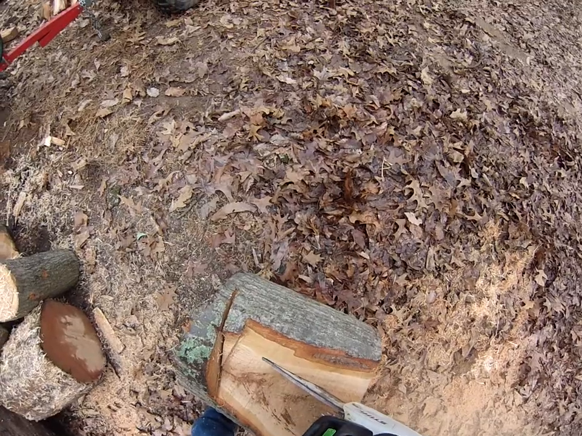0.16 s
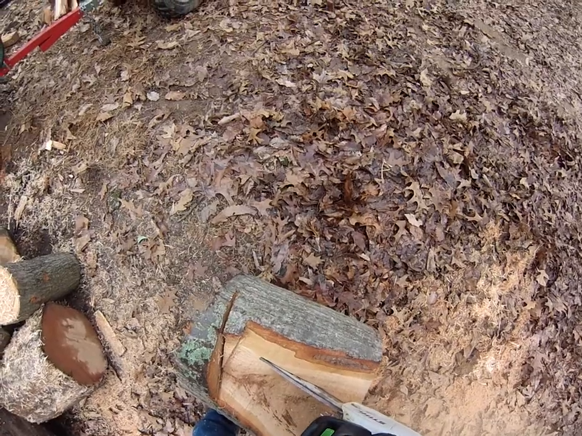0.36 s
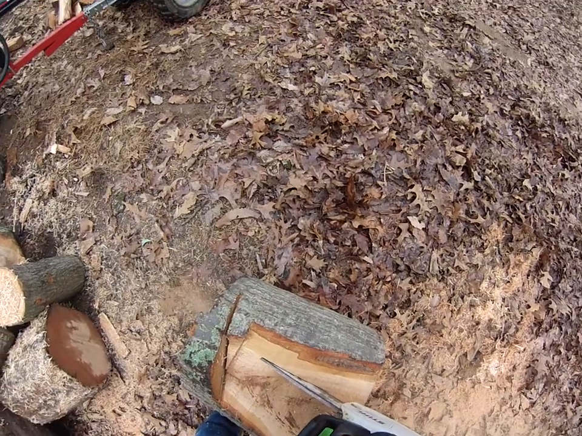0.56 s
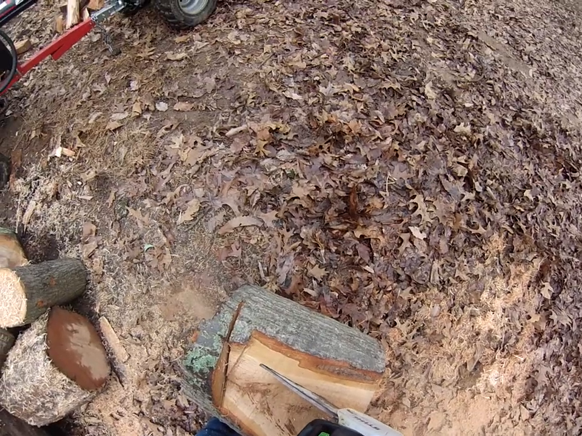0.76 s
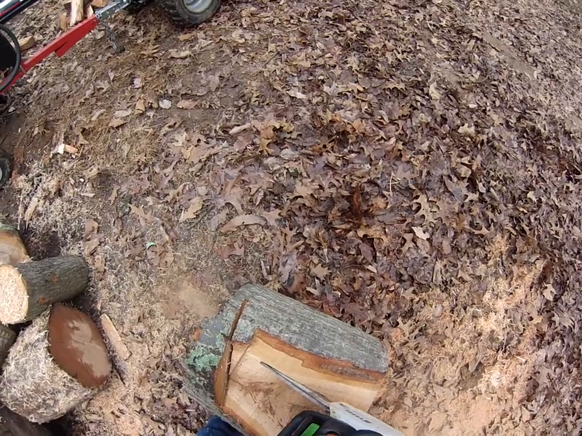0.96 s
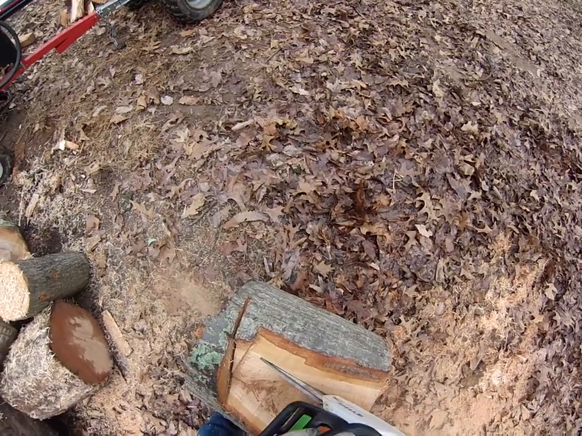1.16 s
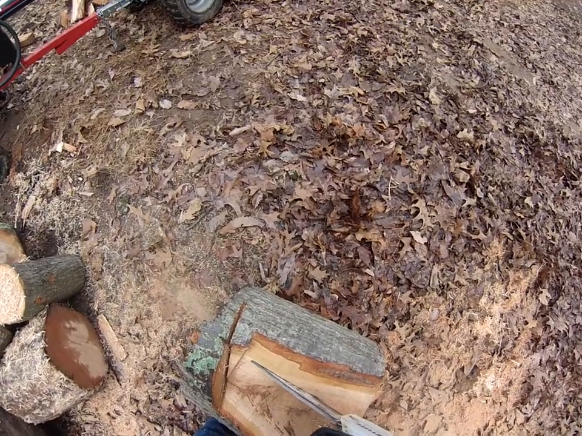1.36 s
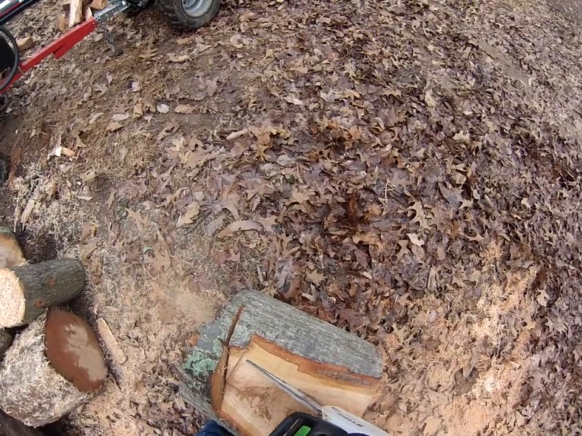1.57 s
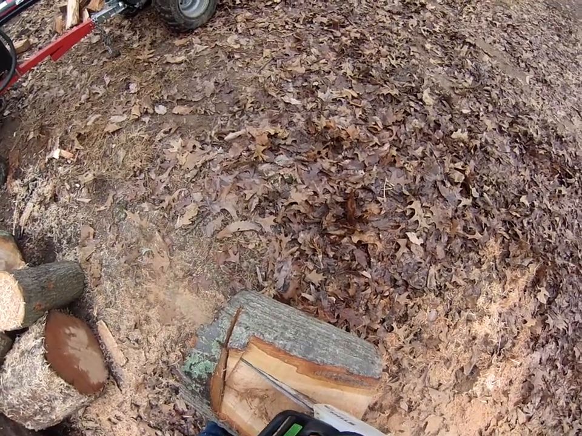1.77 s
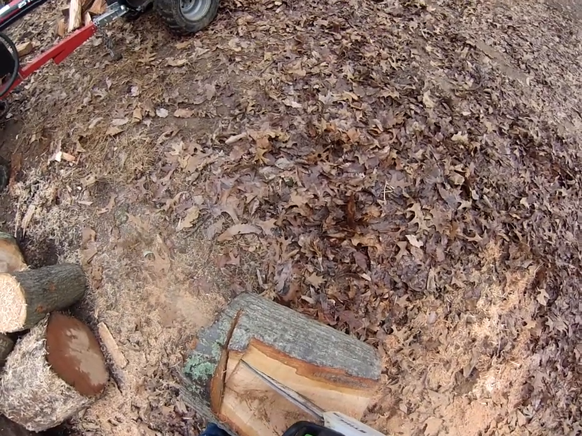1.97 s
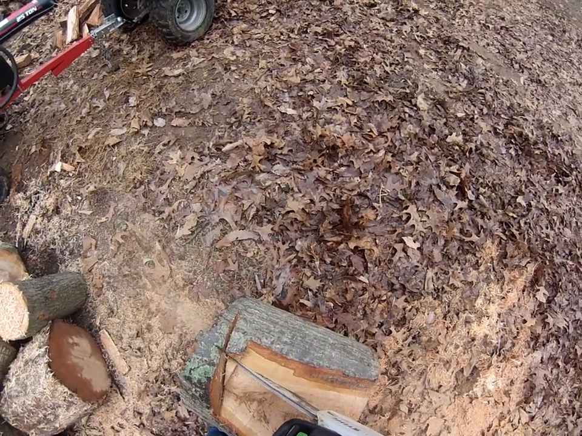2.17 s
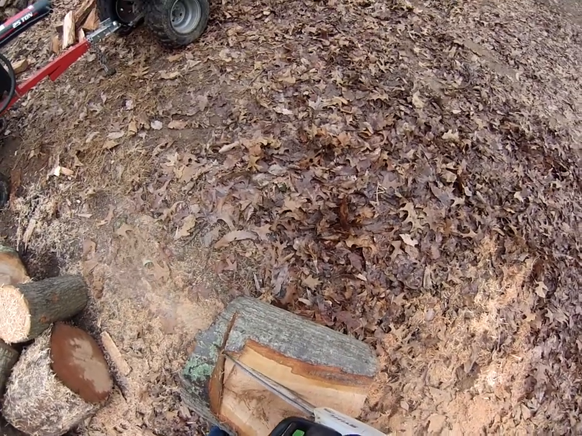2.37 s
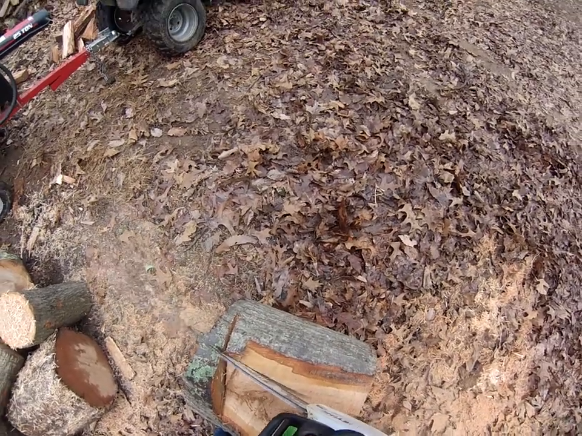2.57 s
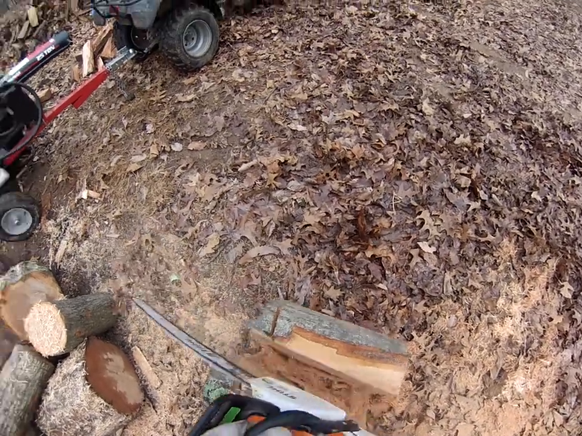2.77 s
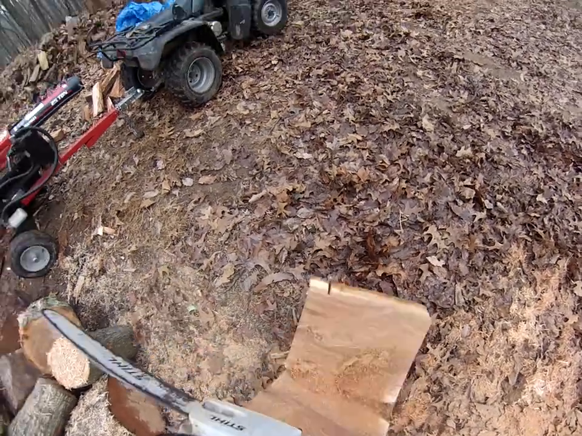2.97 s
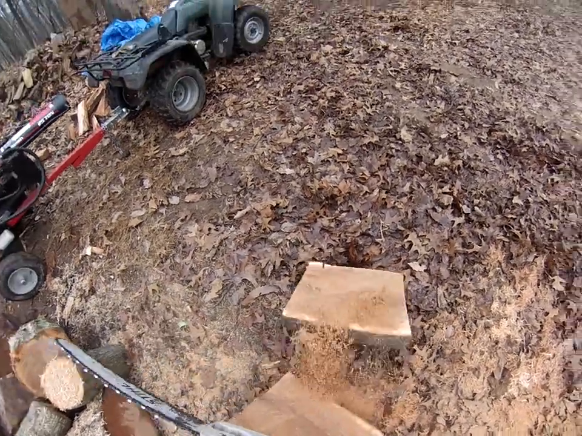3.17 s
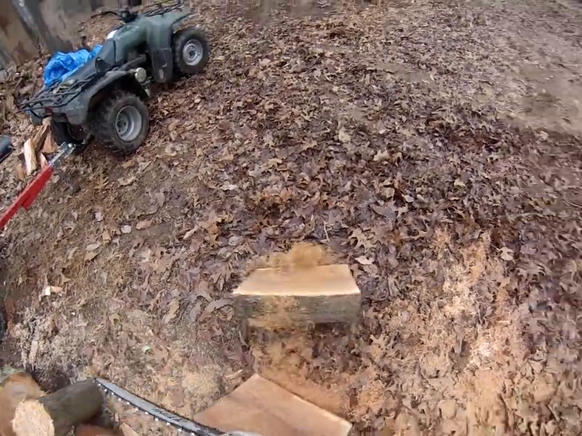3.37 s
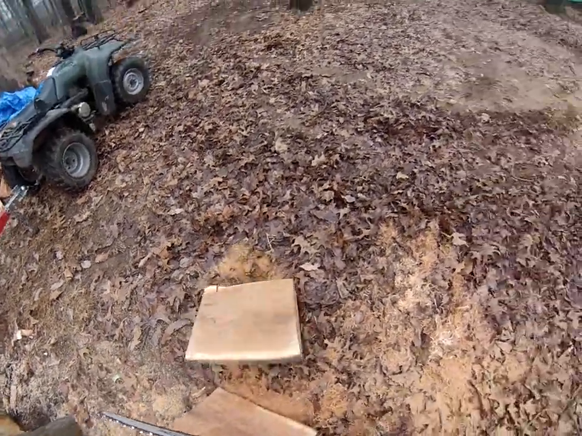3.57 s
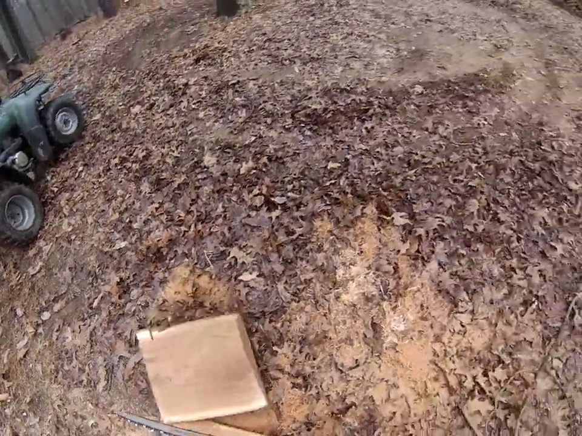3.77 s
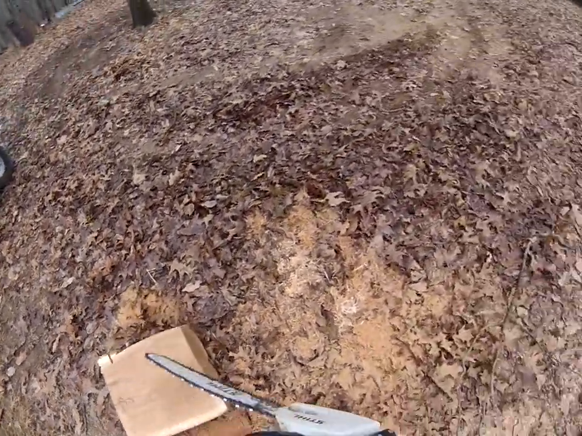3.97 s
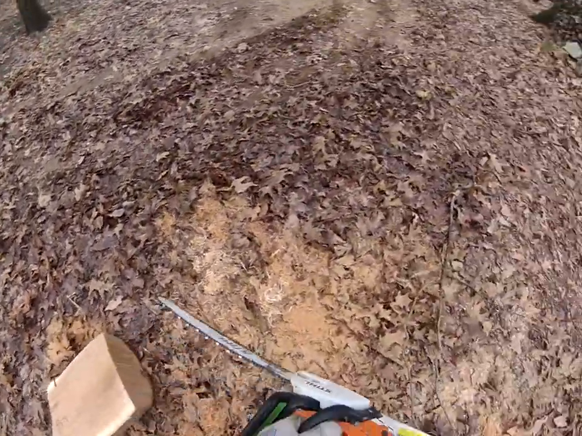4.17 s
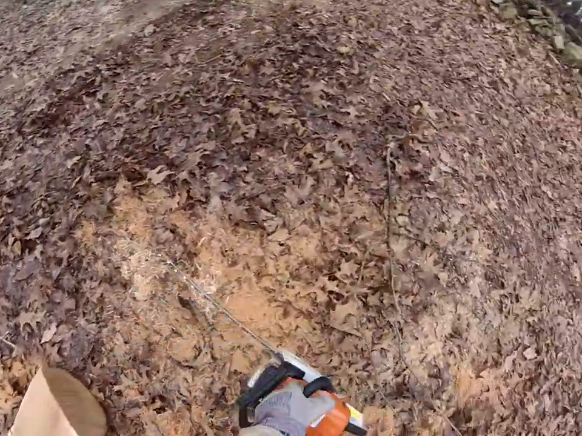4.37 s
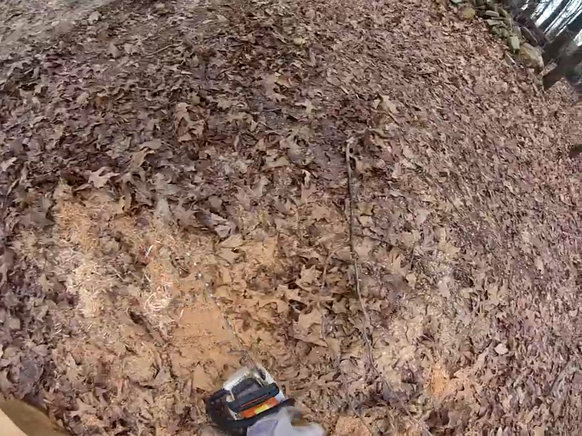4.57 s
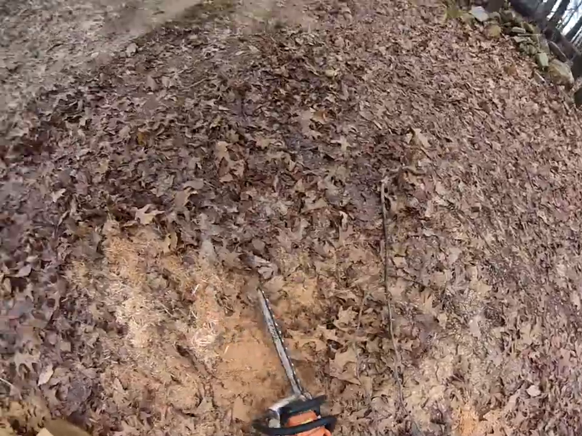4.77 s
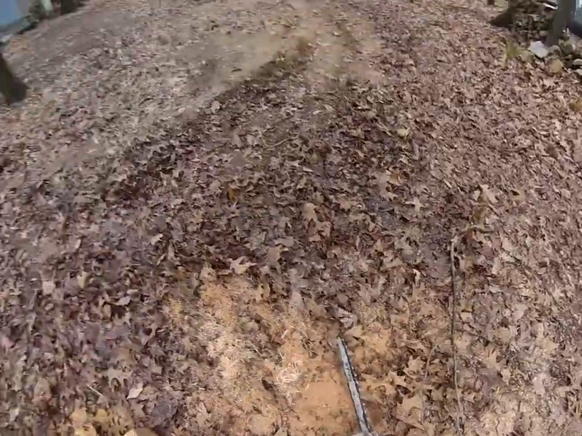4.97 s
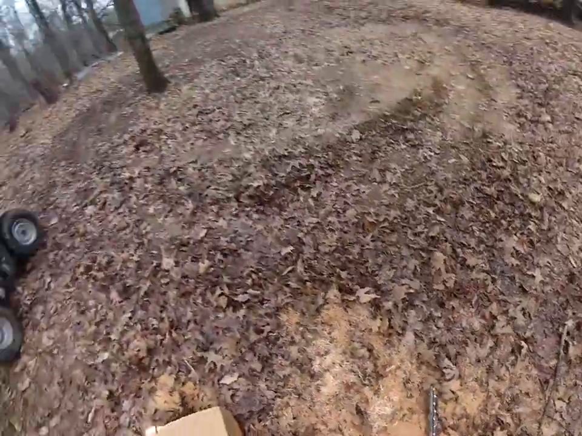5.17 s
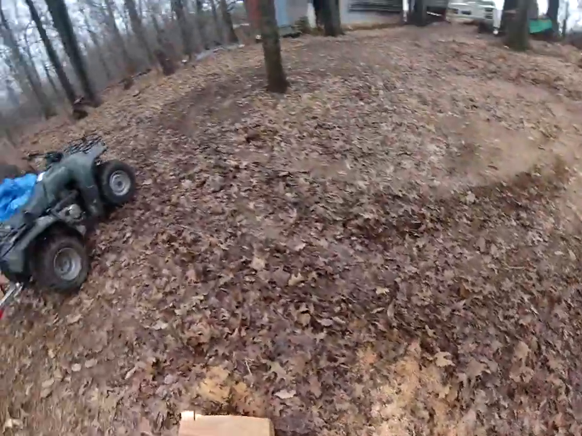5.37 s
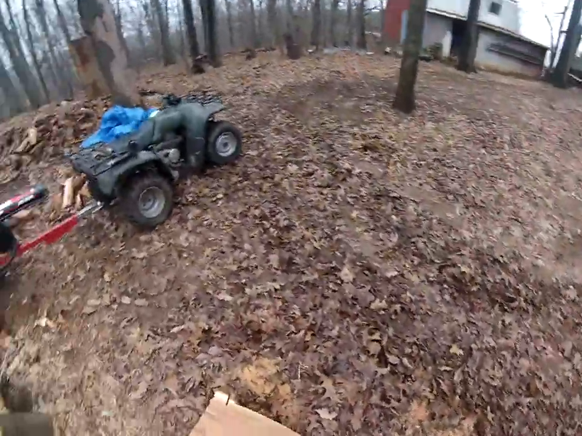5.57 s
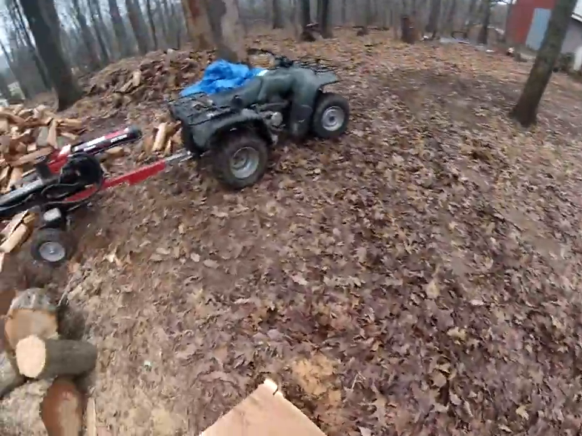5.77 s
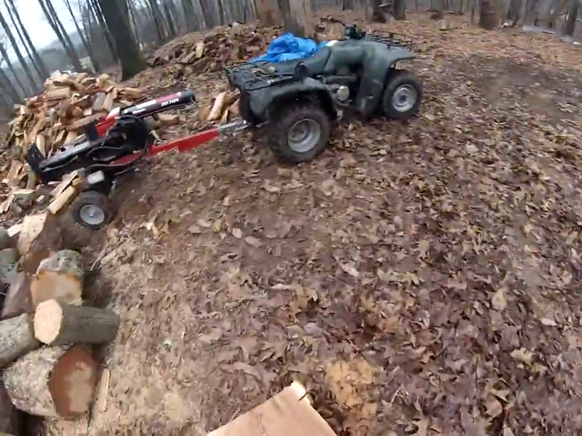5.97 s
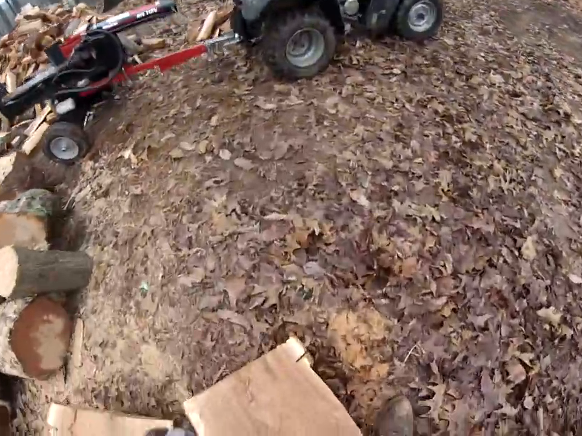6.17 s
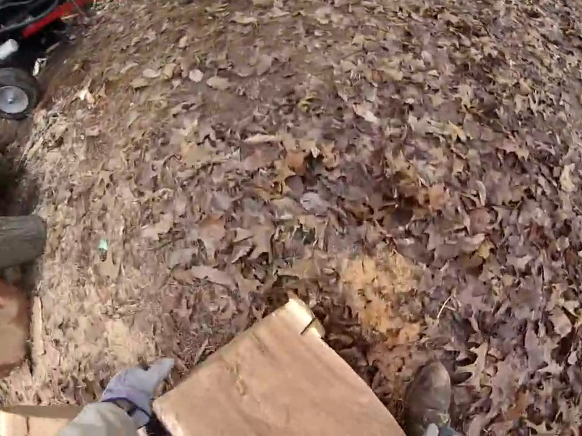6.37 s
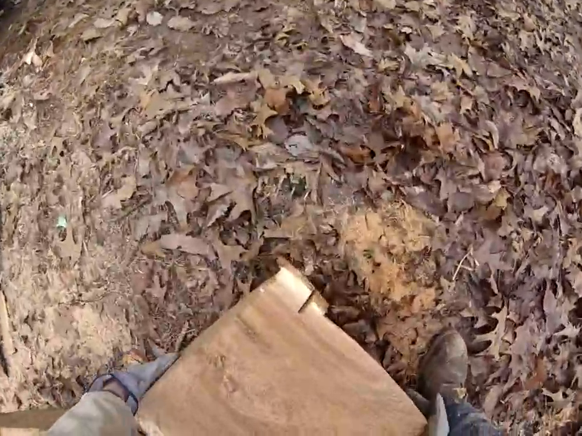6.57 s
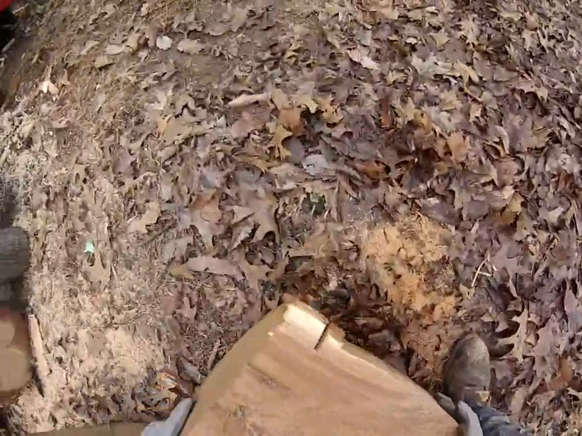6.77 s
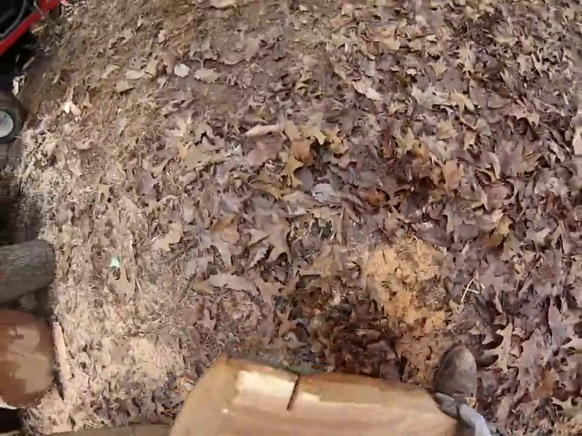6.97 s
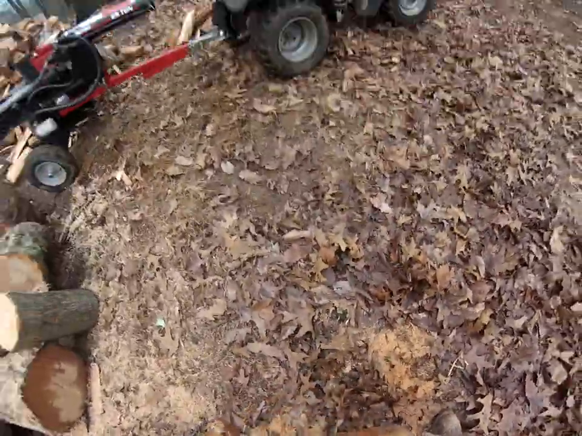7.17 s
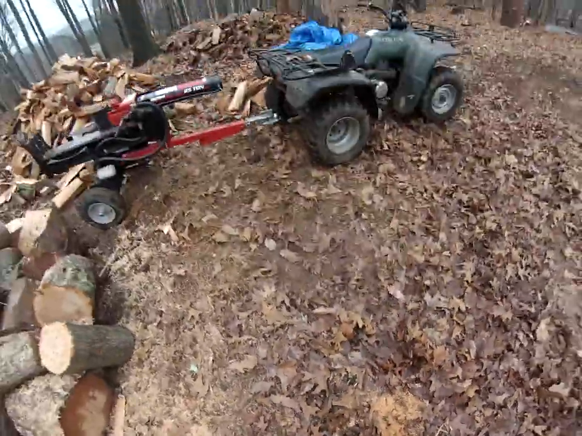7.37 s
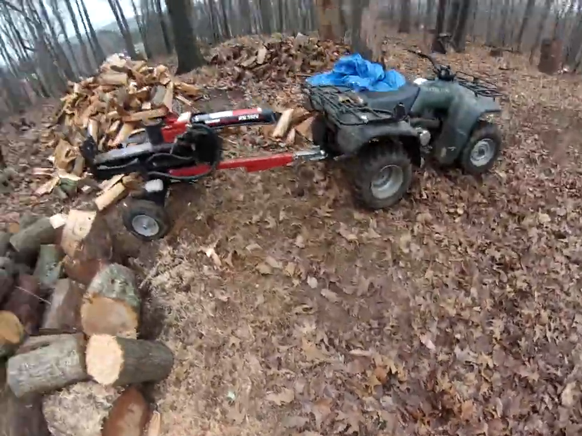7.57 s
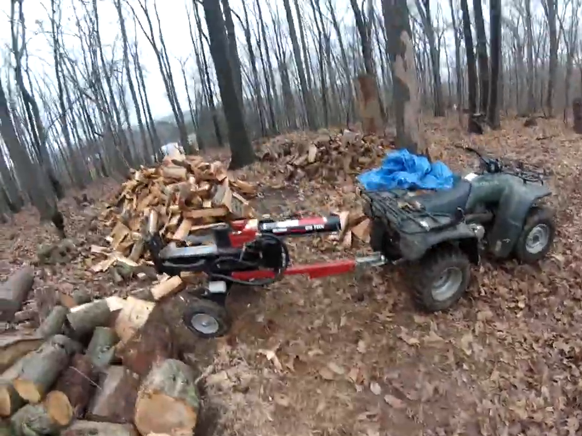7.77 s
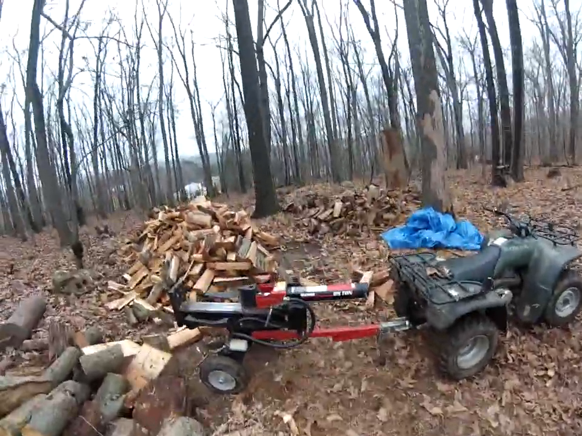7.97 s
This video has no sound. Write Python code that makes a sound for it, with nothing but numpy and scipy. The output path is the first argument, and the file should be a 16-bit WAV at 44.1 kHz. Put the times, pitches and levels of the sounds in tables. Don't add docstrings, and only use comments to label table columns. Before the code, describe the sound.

Outdoors in a leafy woodlot, a helmet microphone hears a two-stroke chainsaw rasping hard through a log, its pitch sagging then climbing. It breaks free, flares, drops and is stopped with a sharp clack. A popping, rattling idle sputters out in slowing strokes. Behind, a splitter engine drones and whines, growing clearer, while wind thumps, leaves tick and a lifted wood block knocks.

```python
import sys
import numpy as np
from scipy import signal
from scipy.fft import next_fast_len
from scipy.io import wavfile
from scipy.ndimage import uniform_filter1d

SR = 44100
rng = np.random.default_rng(int(sys.argv[2]) if len(sys.argv) > 2 else 0)


def makeup_ratio(level_db):
    decades = np.asarray(level_db, float) / 20
    return 10 ** decades


def wrap_up_sound(samples):
    columns = np.atleast_2d(samples).T
    tamed = np.clip(columns, -1, 1)
    steps = np.round(tamed * 32767).astype(np.int16)
    wavfile.write(sys.argv[1], SR, steps)


N = 354123
T = np.arange(N) / SR

# frequency in Hz, level in dB.
WIND_BODY = [(5.9, -6), (10, 7), (28, -2), (40, 2.5), (75, -66), (107, -58), (130, -30), (170, -86),
             (290, -120)]
# peak time in seconds, level in dB, half length in seconds.
GUSTS = [(0.107, -29, 0.043), (0.402, -29, 0.084), (0.852, -36, .08), (1.3, -35, 0.44), (2.701, -42, 0.048),
         (3.15, -28.5, 0.031), (3.417, -44, 0.032), (3.674, -38, 0.032), (3.893, -42, 0.034),
         (4.08, -35, 0.03), (4.5, -41, 0.2), (5.05, -41.5, 0.034), (5.17, -44, 0.027),
         (5.497, -27.5, 0.034), (5.585, -25.5, 0.06), (6.004, -21, 0.037), (6.1, -30, .03),
         (6.24, -30, .03), (6.36, -29, .08), (6.55, -33, .1), (6.74, -23, .05), (6.85, -26, .05),
         (7.07, -24, .04), (7.26, -20, .04), (7.338, -19.5, 0.071), (7.557, -25, 0.045),
         (7.696, -21.5, 0.034), (7.773, -20.5, 0.025), (7.89, -35, 0.059)]
# start in seconds, level in dB, centre in Hz, width in Hz.
LEAF_TICKS = [(4.6463, -45, 11500, 6000), (4.6853, -40, 8000, 6000), (4.698, -38, 9500, 9000),
              (4.706, -44, 10000, 8000), (4.792, -38, 5160, 920), (4.793, -49, 8650, 4000),
              (5.3966, -53, 9700, 2500), (5.504, -35, 9800, 2600), (5.5727, -41, 11000, 5000),
              (6.0993, -37, 9000, 3200), (7.3014, -45, 7800, 3000)]
# start in seconds, low level in dB, knock level in dB, low pitch in Hz.
WOOD_BUMPS = [(4.700, -45, -50, 474), (5.459, -44, -56, 300), (5.47, -30, -60, 70), (5.96, -34, -62, 65),
              (6.499, -41, -50, 170), (6.51, -40, -60, 90), (7.194, -38, -36, 310), (7.236, -34, -44, 217),
              (7.272, -37, -55, 200), (7.311, -33, -36, 290), (7.393, -38, -35, 300),
              (7.695, -43, -41, 220), (7.915, -41, -55, 165), (7.935, -42, -58, 160)]
# start in seconds, level in dB.
MOUNT_RAPS = [(7.1965, -24), (7.208, -30), (7.241, -30), (7.3135, -25), (7.321, -29), (7.381, -27),
              (7.3955, -24)]

# frequency in Hz, level in dB.
SPLITTER_BODY = [(41, -40), (70, -1), (144, -12.5), (302, -24), (346, -11), (542, -18), (694, -14),
                 (777, -19.5), (930, -13), (1220, -4.5), (2740, -22.5), (3590, -15), (4200, -26.5),
                 (9870, -38), (15100, -46)]
# centre in Hz, width in Hz, lift in dB.
SPLITTER_RINGS = [(825, 66, 6), (1210, 23, -7), (1384, 87, 10), (1480, 55, 5.5), (1720, 240, 8),
                  (2340, 92, 6.5), (3304, 136, -5), (4930, 170, 4.5)]
# frequency in Hz, level in dB.
HUM_BODY = [(60, -23), (110, -7.5), (137, 4), (165, -7), (250, -11), (350, -11.5), (440, -24), (550, -10),
            (700, -19)]
# multiple of the firing rate, loudest time in seconds, half length in seconds, level against the drone in dB.
PUMP_LINES = [(20, 6.9, 1.5, -15), (22, 4.13, 1.14, -12), (22, 5.42, 0.41, -11), (22, 6.7, 0.36, -20),
              (28, 5.94, .5, -10.5), (28, 7.45, 0.39, -10.5), (44, 4.18, 0.87, -1), (44, 5.27, 0.39, -2.5),
              (44, 5.95, .15, -4), (44, 6.86, 1, -2.5), (46, 4.4, 0.81, -6.5), (46, 5.5, 0.43, -8),
              (48, 6.78, 0.48, -0.5), (49, 3.8, 0.79, -6), (49, 5.42, 0.21, -1), (49, 7.9, 0.18, -4),
              (52, 7.55, 0.13, -0.5), (50, 4.05, .4, -5), (45, 5.55, .5, -10), (52, 6.4, .3, -10),
              (54, 5.4, .3, -7), (62, 6.6, 0.33, -12), (66.6, 6.76, 0.52, -5.5), (79, 4.3, 0.68, -15),
              (87.3, 7.4, 0.92, -16), (131, 5.7, 1.5, -22)]
# time in seconds, firings per second.
GOVERNOR_SPEED = [(4.1, 27.3), (4.25, 27.5), (4.4, 27.3), (4.55, 27.5), (4.87, 27.4), (5.04, 27.18),
                  (5.18, 27.85), (5.32, 27.5), (5.57, 27.7), (5.7, 27.2), (5.92, 27.95), (6.09, 27.4),
                  (6.47, 27.3), (6.57, 27.5), (6.92, 27.25), (7.45, 27.5), (7.75, 27.45), (8.03, 27.7)]
# time in seconds, gain in dB.
FACING = [(4.3, -18), (4.62, -22), (4.84, -20.5), (5.39, -8.5), (5.72, -5.5), (6.3, 2), (6.97, 2.5),
          (7.49, -1), (8.03, -3.5)]
# level when faced in dB, share of the turn it follows (no unit).
SPLITTER_PARTS = [
    (-50.5, 0.29),
    (-42.5, 0.25),
    (-50.5, 0.35),
    (-55.5, 0.93),
    (-62.5, 0.24),
    (-52.5, 0.28),
]

# frequency in Hz, level in dB.
IDLE_BODY = [(590, -54), (950, -21), (1170, -1.5), (1630, -1.5), (1830, -9), (2190, -1.5), (2940, -7.5),
             (5320, -6.5), (5960, -18.5), (8280, -19.5), (15100, -41)]
# centre in Hz, width in Hz, lift in dB.
IDLE_RINGS = [(1653, 26, 8), (2177, 53, 10.5), (2596, 160, 8.5), (3484, 69, 9), (4720, 90, 6.5),
              (5300, 96, 7.5), (6520, 350, 7.5), (8350, 430, 4)]
# time in seconds, crank speed in Hz.
IDLE_SPEED = [(3.05, 67.7), (3.186, 60.14), (3.308, 55.4), (3.408, 54.5), (3.798, 54.88), (3.856, 50.5),
              (4.058, 35.6), (4.19, 26.1), (4.2, 25.7)]
# multiple of the crank speed, level in dB.
THUD_ORDERS = [(2, -9.5), (3, -8), (4, -5), (5, -10), (6, -8), (7, -3), (8, -6), (9, -8), (10, -17),
               (11, -4), (12, -6.5), (13, -9), (15, -10.5)]
# start in seconds, length in seconds, depth in dB.
MISFIRES = [(3.147, 0.11, -1), (3.404, 0.11, 0), (3.65, .13, -4)]
# time in seconds, level over the usual in dB.
HARD_BURNS = [(3.1936, 5), (3.2619, 3.5), (3.2973, 4), (3.3507, 1.5), (3.4435, 2), (3.4809, 1.5),
              (3.5707, 3), (3.6251, 1.5), (3.7169, 2.5), (3.7912, 2), (3.8461, 3.5), (3.864, -1),
              (3.886, 0.5), (3.907, -1), (3.93, -5), (3.59, -2), (3.607, -1)]
# time in seconds, rattle level in dB, thud level in dB.
COAST_STROKES = [(3.952, -27, -46), (3.976, -33, -45), (4.001, -29, -45), (4.03, -26.5, -46),
                 (4.0603, -31, -46), (4.0944, -33, -51), (4.11, -33.5, -45), (4.153, -36, -45.5),
                 (4.2048, -35, -53), (4.259, -37, -56), (4.3216, -42, -58), (4.395, -45, -60),
                 (4.502, -49, -60)]
# frequency in Hz, level in dB.
PUFF_BODY = [(80, -36), (150, 1), (250, 8), (350, 1), (600, -6), (1000, -33)]

# start in seconds, level in dB, time to fade by 60 dB in seconds.
CHAIN_BRAKE = (3.036, -12.5, 0.04)

# time in seconds, crank speed in Hz, effort in dB.
CUT_SPEED = [(0.0, 164.2, -18.5), (0.1, 159.3, -19), (0.23, 148.7, -21), (0.33, 142.9, -21),
             (0.48, 136.8, -23), (0.68, 146.4, -21.5), (0.88, 158.5, -20.5), (1.06, 167.6, -20.5),
             (1.21, 172.6, -20), (1.32, 173.3, -19.5), (1.51, 188.5, -17), (1.62, 189.3, -17.5),
             (1.72, 179.7, -18), (1.91, 169.9, -19), (2.07, 183.1, -18), (2.13, 183.5, -18),
             (2.25, 179.1, -18), (2.4, 179, -18), (2.53, 176.1, -17.5), (2.6, 178.4, -18)]
# time in seconds, crank speed in Hz, effort in dB.
RACE_SPEED = [(2.7, 202.7, -15.5), (2.736, 211.2, -16), (2.776, 217.6, -18.5), (2.814, 208.7, -19.5),
              (2.864, 196.8, -18.5), (2.952, 178.6, -19), (3.01, 171.9, -18.5), (3.034, 166.8, -18.5),
              (3.07, 154, -22)]
# frequency in Hz, level in dB.
CUT_BODY = [(240, -44), (400, -16.5), (594, -10.5), (702, -13), (1140, -12.5), (1570, -2), (1860, -6.5),
            (2130, 1), (2970, -9.5), (3520, -6), (5140, 1), (5720, -9), (15100, -24.5)]
# centre in Hz, width in Hz, lift in dB.
CUT_RINGS = [(1340, 184, 6), (1632, 130, 3.5), (2152, 72, 10.5), (2640, 440, 10.5), (3200, 230, 4.5),
             (3540, 750, 10), (4000, 80, -7.5), (4310, 600, 1.5), (4600, 140, -6.5), (5000, 320, 2.5)]
# centre in Hz, width in Hz, lift in dB.
FIZZ_RINGS = [(6360, 930, 9), (8040, 210, 4.5), (9500, 1800, 6), (11720, 380, 7), (13700, 600, 6.5)]
# frequency in Hz, lift in dB.
ORDER_CLARITY = [(1100, -2.5), (1900, 3), (2150, 3), (2400, 4), (3500, 4.5), (4400, 8.5), (5100, 2.5),
                 (5600, 7), (6500, -44)]
# frequency in Hz, level in dB.
EXHAUST = [(120, -45), (195, -28), (270, -36), (335, -30), (390, -43), (680, -32.5), (950, -33),
           (1400, -41)]
# centre in Hz, width in Hz, lift in dB.
EXHAUST_DIPS = [(561.5, 89, -14), (1075, 45, -14)]
# start in seconds, length in seconds, order, lift in dB.
ORDER_LOCKS = [(0, 0.05, 22, 4), (.09, .09, 22, 7), (.09, 0.08, 17, 9), (0, .2, 14, 4), (.04, .12, 27, 4),
               (.04, .1, 31, 4), (.17, .08, 23, 4), (.24, .13, 24, 5), (.36, .24, 26, 4), (.37, .3, 31, 6),
               (.58, .17, 30, 5), (.68, .14, 29, 5), (.45, .4, 16, 3), (.6, .35, 10, 3), (.57, 0.15, 24, 4),
               (0.806, 0.23, 22, 9), (0.802, 0.13, 14, 11.5), (0.84, .56, 15, 7), (1.05, .11, 15, 5.5),
               (0.896, 0.18, 31, 8), (1.058, 0.22, 25, 7.5), (1.174, 0.15, 29, 7), (1.17, .1, 24, 6),
               (1.2, 0.21, 20, 8), (1.29, .08, 21, 5), (1.43, 0.22, 18, 6.5), (1.44, .2, 17, 5),
               (1.44, 0.2, 23, 4.5), (1.445, 0.24, 7, 7), (1.448, 0.24, 11, 4.5), (1.66, 0.98, 20, 4),
               (1.7, 0.28, 15, 3), (1.69, 0.35, 9, 5.5), (1.696, 0.13, 28, 9), (1.7, 0.091, 12, 3.5),
               (1.7, .3, 21, 3), (1.78, .17, 26, 3), (1.88, .12, 25, 4), (1.944, 0.56, 24, 4),
               (2.021, 0.24, 23, 6), (1.99, 0.6, 12, 2.5), (2.147, .45, 15, 3), (2.18, 0.45, 9, 4.5),
               (2.121, 0.5, 28, 4), (2.1, .15, 14, 4), (1.38, .12, 24, 5), (2.24, .38, 21, 3),
               (2.52, .1, 25, 5), (2.63, .17, 7, 5), (2.83, .08, 13, 4)]
# start in seconds, length in seconds, order, level in dB.
BAR_SINGS = [
    (2.745, .088, 10, -18.5),
    (2.857, .046, 11, -21.5),
    (2.933, .056, 12, -21.5),
]
# multiple of the crank speed, level in dB.
SPINNING_ORDERS = [(1, -41), (2, -34.5), (3, -39), (4, -36), (5, -41), (6, -40.5), (7, -34), (8, -32),
                   (9, -34)]


def evened(x):
    return x / np.sqrt(np.mean(x ** 2) + 1e-20)


def columns(rows, t=T):
    s, *values = np.transpose(rows)
    return [np.interp(t, s, v) for v in values]


def body_db(points, rings, hz):
    f, db = np.transpose(points)
    base = np.interp(np.log(hz + 1), np.log(f + 1), db, left=-90, right=-90)
    return base + sum(lift / (1 + (2 * (hz - c) / w) ** 2) for c, w, lift in rings)


def sliding_db(points, rings, hz, step):
    return body_db(points, rings, hz[::step]).repeat(step)[:len(hz)]


def colour(x, points, rings=()):
    gain = np.log(makeup_ratio(body_db(points, rings, abs(np.fft.fftfreq(16384, 1 / SR)))))
    taps = np.fft.ifft(np.exp(gain - 1j * signal.hilbert(gain).imag)).real[:8192]
    return signal.oaconvolve(x, taps)[:len(x)]


def band(x, lo_hz, hi_hz):
    return evened(signal.sosfilt(signal.butter(3, [lo_hz, hi_hz], "band", fs=SR, output="sos"), x))


def drift(count, span, size=N):
    knots = rng.standard_normal((count, int(size / SR / span) + 3))
    at = np.arange(0, size, 32) / SR / span
    rows = np.array([np.interp(at, np.arange(len(k)), k) for k in knots])
    return rows.repeat(32, axis=1)[:, :size] * 1.2


def gate(t0, t1, rise, fall, t=T):
    return np.clip((t - t0) / rise, 0, 1) * np.clip((t1 - t) / fall, 0, 1)


def patchy(x, depth_db, bins, frames):
    z = signal.stft(x, nperseg=512)[2]
    field = uniform_filter1d(rng.standard_normal(z.shape), int(bins), 0)
    field = uniform_filter1d(field, int(frames), 1)
    return signal.istft(z * makeup_ratio(depth_db * evened(field)), nperseg=512)[1][:len(x)]


def wind():
    breeze_db = -41.5 + 4.5 * drift(1, 0.046)[0]
    gusts = sum(makeup_ratio(2 * db) * np.exp(-((T - s) / half) ** 2) for s, db, half in GUSTS)
    level_db = 10 * np.log10(makeup_ratio(2 * breeze_db) + gusts)
    lumps = band(colour(rng.standard_normal(N), WIND_BODY), 10, 32)
    envelope = abs(signal.hilbert(lumps, next_fast_len(N)))[:N]
    lumps = band(lumps / (envelope + .15), 8, 42)
    flutter = band(rng.standard_normal(N), 39, 116) * abs(lumps) * makeup_ratio(0.68 * (level_db + 28.0) - 54)
    rumble = signal.sosfilt(signal.butter(4, 48, fs=SR, output="sos"), makeup_ratio(level_db) * lumps)
    return rumble + flutter


def ticks():
    out, t = np.zeros(N), T[:600]
    for s, db, hz, wide_hz in LEAF_TICKS:
        noise = rng.standard_normal(600)
        snap = band(noise, max(hz - wide_hz / 2, 500), min(hz + wide_hz / 2, 16000)) * makeup_ratio(-60 * t / 0.0087)
        out[round(s * SR):][:600] += makeup_ratio(db) * snap / abs(snap).max()
    return out


def bumps():
    out, t = np.zeros(N), T[:4000]
    for s, db, top_db, hz in WOOD_BUMPS:
        blow = rng.standard_normal(4000) + 14 * (t == t[40])
        low = band(blow, 0.32 * hz, 1.4 * hz) * makeup_ratio(db - 0.5 - 60 * t / 0.061)
        top = band(blow, 1860, 2270) + 0.4 * band(blow, 330, 1760)
        top = top * makeup_ratio(top_db - 3 - 60 * t / 0.1)
        attack = np.clip(t / 0.0042, 0, 1) * (1 + 0.74 * makeup_ratio(-60 * t / 0.0068))
        out[round(s * SR):][:4000] += (low + top) * attack
    return out


def raps():
    out, t = np.zeros(N), T[:300]
    push = np.exp(-((t - .001) / 0.000093) ** 2)
    swing_back = 0.34 * np.exp(-((t - .0025) / 0.0011) ** 2)
    for s, db in MOUNT_RAPS:
        out[round(s * SR):][:300] += makeup_ratio(db) * (push - swing_back)
    return out


def pump(turns):
    sway = drift(count=2 * len(PUMP_LINES), span=0.098)
    out = np.zeros(N)
    for (k, s, half, db), level, phase in zip(PUMP_LINES, sway[::2], sway[1::2]):
        swell = makeup_ratio(db + 1.6 * level) * np.exp(-((T - s) / half) ** 2)
        out += swell * np.cos(2 * np.pi * (round(k) * turns + .12 * phase))
    return out


def splitter():
    facing_db = columns(FACING)[0]
    parts_db = [db + share * facing_db for db, share in SPLITTER_PARTS]
    hum_db, drone_db, knock_db, gap_db, clatter_db, fizz_db = parts_db
    firing_hz = 27.42
    turns = np.cumsum(columns(GOVERNOR_SPEED)[0]) / SR
    fired = np.diff(np.floor(turns), prepend=0)
    pop = signal.oaconvolve(fired, rng.standard_normal(900) * makeup_ratio(-60 * T[:900] / 0.42))[:N]
    throb = 2.3 + np.exp(-(turns % 1) / 4.8) + 2.0 * np.exp(-((turns + .5) % 1) / 0.63)
    source = .8 * evened(pop) + evened(throb * rng.standard_normal(N))
    engine = patchy(colour(source, SPLITTER_BODY, SPLITTER_RINGS), 2.2, 5.4, 70)
    hum = sum(makeup_ratio(body_db(HUM_BODY, (), k * firing_hz)) * np.cos(2 * np.pi * (k * turns + .5 * rng.random()))
              for k in range(3, 25))
    hum = evened(hum) + .5 * band(engine, 56, 490)
    drone = .9 * band(engine, 700, 2000)
    shifted = np.roll(engine, round(3 * SR / firing_hz))
    return (makeup_ratio(hum_db) * hum + makeup_ratio(drone_db) * (drone + pump(turns))
            + makeup_ratio(knock_db) * band(engine, 2090, 2670) + makeup_ratio(gap_db) * band(shifted, 2580, 3270)
            + makeup_ratio(clatter_db) * band(engine, 3140, 4660) + makeup_ratio(fizz_db) * band(shifted, 4730, 14300))


def idle_exhaust(halves, dying, thud_db):
    n = int(4.2 * SR)
    sway = drift(count=len(THUD_ORDERS), span=.04, size=n)
    orders = np.zeros(n)
    for (k, db), w in zip(THUD_ORDERS, sway):
        phase = np.pi * k * (halves[:n] - .8) + 0.33 * rng.standard_normal()
        orders += makeup_ratio(db + 2.2 * w - k * dying[:n]) * np.cos(phase)
    missing = sum(makeup_ratio(db) * gate(s, s + length, 0.023, 0.023, T[:n]) for s, length, db in MISFIRES)
    orders = orders * (1 + missing * np.cos(np.pi / 2 * halves[:n]))
    breath = band(np.exp(-(halves / 2 % 1) / 0.35) * rng.standard_normal(N), 180, 1040)
    thud = np.pad(evened(orders), (0, N - n)) + 0.63 * breath
    return thud * makeup_ratio(thud_db) * gate(3.05, 3.953, 0.012, .008)


def idling():
    since = np.maximum(T - 3.05, 0)
    dying = np.clip(T - 3.796, 0, .3)
    hz = columns(IDLE_SPEED)[0]
    turns = np.cumsum(hz) / SR
    glow_db = 10 * np.exp(-since / 0.049)
    thud_db = -44.5 + glow_db - 6 * dying
    rattle_db = -31.5 + glow_db - 26 * dying
    beat = round(3.5695 * SR)
    halves = 2 * (turns - turns[beat] + .012 * drift(1, .03)[0])
    count = np.maximum.accumulate(np.floor(halves)).astype(int)
    strokes = np.diff(count, prepend=count[0]) * gate(3.05, 3.94, .02, .005)
    burn_db = 1.2 * rng.standard_normal(size=200)[count % 200]
    hard_db = sum(db * (abs(T - s) < .006) for s, db in HARD_BURNS)
    power_stroke = np.where(count % 2 == 0, 1, .22)
    slower = np.sqrt(55 / hz)
    exhaust = idle_exhaust(halves, dying, thud_db)
    rattles = strokes * power_stroke * makeup_ratio(rattle_db + burn_db + hard_db) * slower
    puffs = np.zeros(N)
    for s, db, low_db in COAST_STROKES:
        rattles[round(s * SR)] += makeup_ratio(db - 9.5)
        lag_s = .008 * (s < 4.1)
        puffs[round((s + lag_s) * SR)] += makeup_ratio(low_db)
    t = T[:6000]
    burst = (makeup_ratio(-60 * t / .017) + .03 * makeup_ratio(-60 * t / .3)) * np.clip(t / .0045, 0, 1)
    noise = signal.oaconvolve(rattles, burst)[:N] * rng.standard_normal(N) + rattles
    click = 1.0 * (np.arange(8192) == 0)
    puff_size = np.linalg.norm(colour(click, PUFF_BODY))
    rattle_size = np.linalg.norm(colour(click, IDLE_BODY, IDLE_RINGS))
    clatter = patchy(colour(noise, IDLE_BODY, IDLE_RINGS), 2.2, 5.5, 12)
    jingle = signal.sosfilt(signal.butter(2, [6300, 6750], "band", fs=SR, output="sos"), clatter)
    jingle = jingle * 1.3 * np.exp(-(since / .5) ** 2)
    return exhaust + 27 * colour(puffs, PUFF_BODY) / puff_size + 5.28 * (clatter + jingle) / rattle_size


def brake():
    s, db, t60 = CHAIN_BRAKE
    fade = makeup_ratio(db - 60 * np.maximum(T - s, 0) / t60) * np.clip((T - s) / 0.0019, 0, 1)
    return fade * band(rng.standard_normal(N), 808, 2700)


def crank_orders(hz, turns, wander, slip, t):
    lift_db = wander + 2.3 * slip[::-1]
    for s, length, k, db in ORDER_LOCKS:
        lift_db[round(k)] += db * gate(s - .005, s + length, 0.0061, 0.0025, t)
    out = np.zeros(len(t))
    for k in range(7, 38):
        db = sliding_db(CUT_BODY, CUT_RINGS, k * hz, 64) + sliding_db(ORDER_CLARITY, (), k * hz, 64)
        phase = 2 * np.pi * (k * turns + .45 * rng.random()) + .016 * k * slip[k]
        out += makeup_ratio(db + lift_db[k]) * np.cos(phase)
    return out


def exhaust_orders(hz, turns, wander, free, shut, coasted):
    throttle_db = -6 * shut - 43 * coasted
    out = np.zeros(len(hz))
    for k in range(1, 7):
        db = sliding_db(EXHAUST, EXHAUST_DIPS, k * hz, 16) + throttle_db + 0.33 * wander[k - 1]
        db = db + 11 * free * (k in (2, 3))
        db = db + 3 * shut * (k == 1)
        out += makeup_ratio(db) * np.cos(2 * np.pi * (k * turns + rng.random()))
    return np.sqrt(2) * out


def bar_singing(turns, throb, slip, t):
    out = np.zeros(len(t))
    for s, length, k, db in BAR_SINGS:
        k = round(k)
        level = makeup_ratio(db + 7.5 - 55 * np.maximum(t - s - .02, 0) + slip[k])
        level = level * gate(s, s + length, .011, 0.017, t) * (0.79 + .3 * throb)
        out += level * np.cos(2 * np.pi * k * turns + 0.33 * slip[k + 1])
    return out


def cutting():
    n = int(3.2 * SR)
    t = T[:n]
    hz, scream_db = columns(CUT_SPEED + RACE_SPEED, t)
    free = np.clip((t - 2.636) / 0.076, 0, 1)
    throttle_shut_s = 2.77
    shut = np.clip((t - throttle_shut_s) / 0.0083, 0, 1)
    race, coasted = free * (1 - shut), np.maximum(t - throttle_shut_s, 0)
    rasp = (1 - shut) * (.36 - .004 * (hz - 137)) + .34 * shut + .25 * race
    rasp = np.clip(rasp, 0, 1)
    ring_db = -32.5 + 11.5 * free - 10 * coasted
    fizz_db = -27.5 + 0.55 * (1 - shut) * (scream_db + 18.0)
    growl_db = -21.5 + 0.45 * (1 - shut) * (scream_db + 16) + 6 * race

    turns = np.cumsum(hz * (1 + 0.0021 * drift(1, .012, n)[0])) / SR
    wander, slip = drift(count=40, span=.2, size=n), drift(count=40, span=.02, size=n)
    orders = evened(crank_orders(hz, turns, wander, slip, t))
    throb = 0.47 + np.exp(-((turns + 0.11) % 1) / 0.4) + 0.05 * drift(1, .015, n)[0]
    hiss = band(colour(throb * rng.standard_normal(n), CUT_BODY, CUT_RINGS), 474, 5400)
    scream = np.sqrt(1 - rasp) * orders + np.sqrt(rasp) * hiss
    growl, upper = band(scream, 547, 1654), band(scream, 2435, 6100)

    ring = 0.78 * band(orders + 0.4 * hiss, 2083, 2198) + .5 * band(scream, 2050, 2300)
    singing = sum(gate(s, s + length, .006, 0.018, t) for s, length, *_ in BAR_SINGS)
    ring = ring * gate(-1, 3.03, .01, .04, t) * (1 - 0.96 * singing)

    chips = 1 + signal.oaconvolve(rng.random(n) < 12 / SR, makeup_ratio(-60 * T[:400] / 0.0091))[:n]
    fizz = colour((4.1 + throb) * chips * rng.standard_normal(n), CUT_BODY, FIZZ_RINGS)
    fizz = band(patchy(fizz, 2.6, 5.5, 60), 5400, 17400)
    spinning = shut * sum(makeup_ratio(db + 1.2 * slip[round(k)]) * np.cos(2 * np.pi * (round(k) * turns + rng.random()))
                          for k, db in SPINNING_ORDERS)
    grit = makeup_ratio(-48.5) * band(rng.standard_normal(n), 46, 760)

    bites = np.diff(np.floor(turns + .03 * slip[1]), prepend=0) * makeup_ratio(3.1 * rng.standard_normal(n))
    bites = evened(bites) + .35 * throb * rng.standard_normal(n)
    labour = np.clip((175.4 - hz) / 12, 0, 1) * (1 - free)
    buried = makeup_ratio(-27) * labour * (band(bites, 3270, 3840) + 0.48 * band(bites, 4276, 4500))
    screech = makeup_ratio(-24.5) * race ** 2 * band(hiss, 3840, 4600)

    out = exhaust_orders(hz, turns, wander, free, shut, coasted) + spinning + grit + buried + screech
    out = out + makeup_ratio(growl_db) * growl + makeup_ratio(scream_db) * upper + makeup_ratio(ring_db) * ring + makeup_ratio(fizz_db) * fizz
    out = out + bar_singing(turns, throb, slip, t)
    return np.pad(out, (0, N - n)) * gate(-1, 3.085, .01, 0.043)


def scene():
    background = wind() + ticks() + bumps() + raps() + splitter()
    saw = idling() + brake() + cutting()
    return (background + saw)[None]


def top_cut(x):
    return signal.sosfilt(signal.butter(12, 15280, fs=SR, output="sos"), x)


def record(dry):
    taps = signal.firwin(1023, 15250, window=("kaiser", 9), fs=SR)
    mix = signal.oaconvolve(dry, taps[None], "same")
    return top_cut(mix)


dry = scene()
out = record(dry)
wrap_up_sound(out)
```